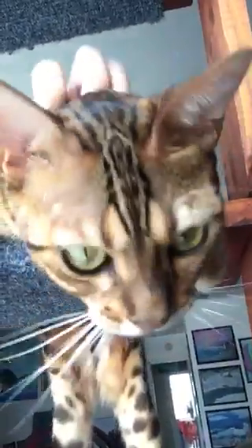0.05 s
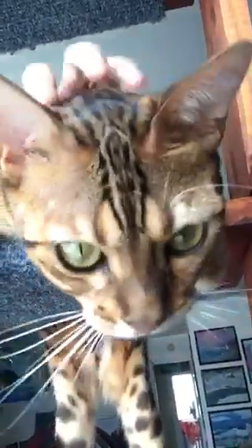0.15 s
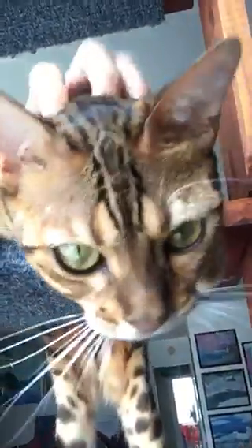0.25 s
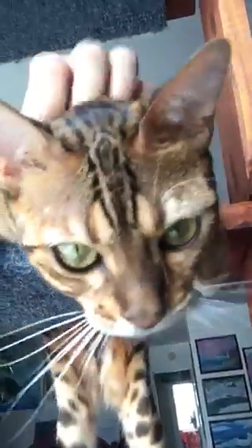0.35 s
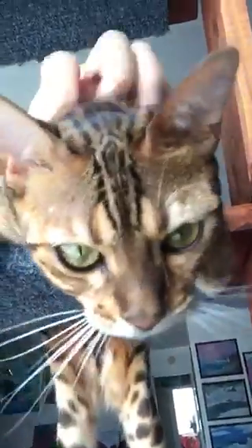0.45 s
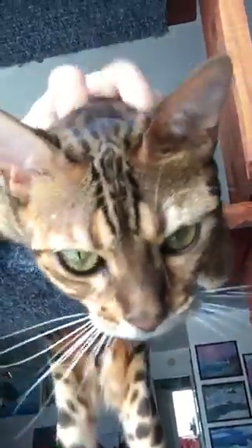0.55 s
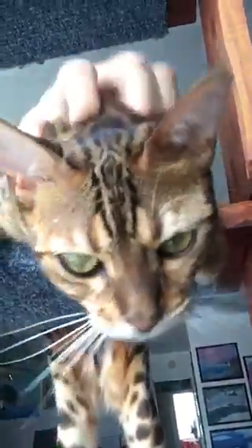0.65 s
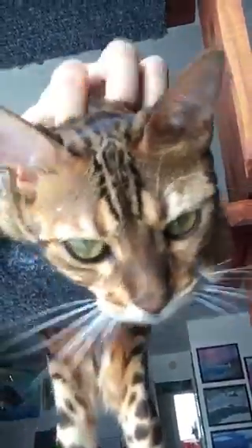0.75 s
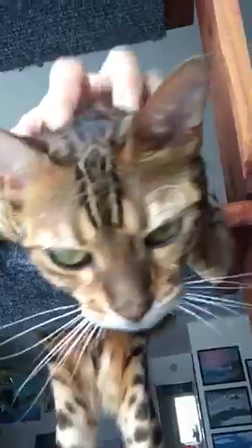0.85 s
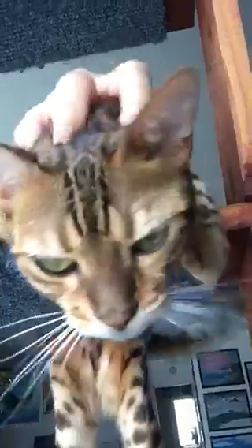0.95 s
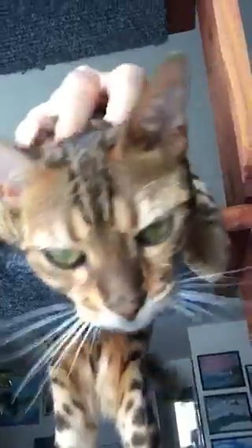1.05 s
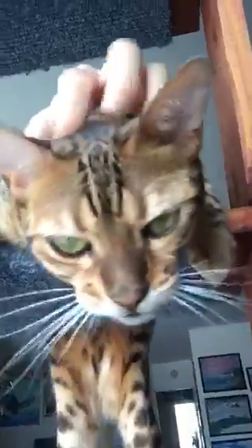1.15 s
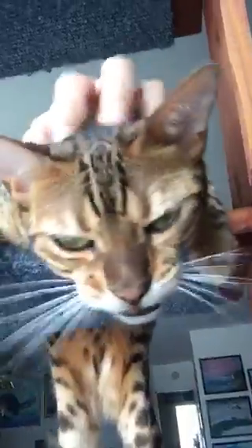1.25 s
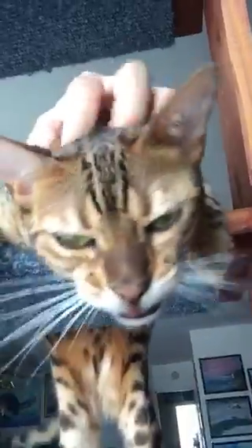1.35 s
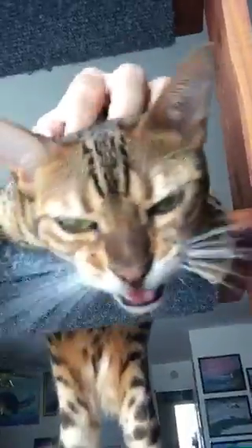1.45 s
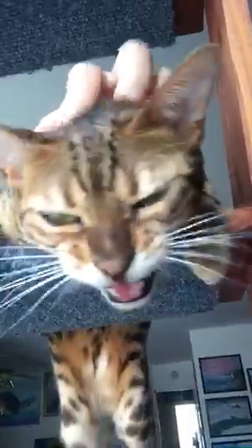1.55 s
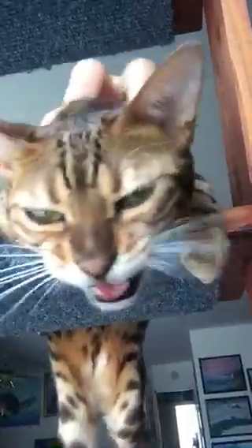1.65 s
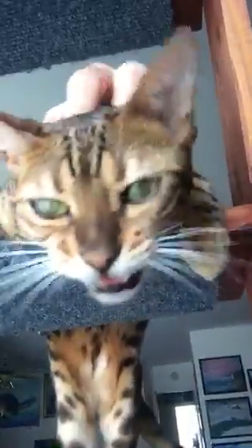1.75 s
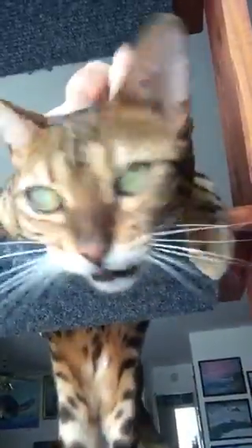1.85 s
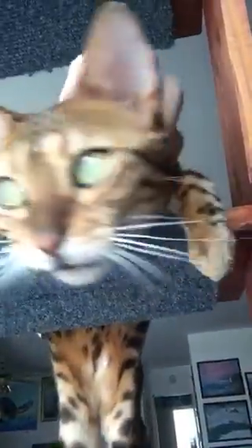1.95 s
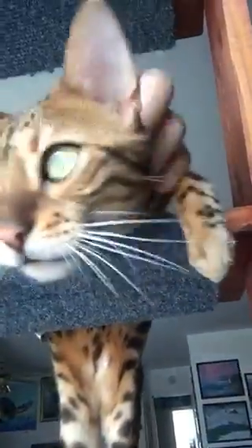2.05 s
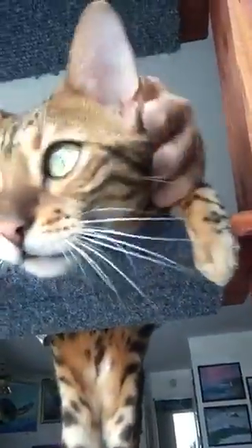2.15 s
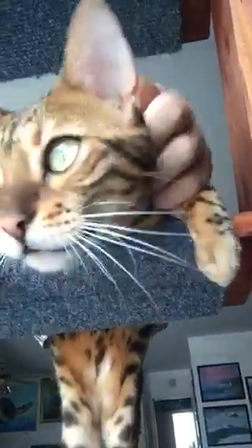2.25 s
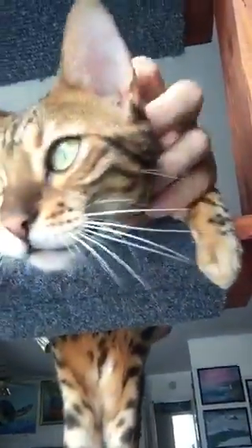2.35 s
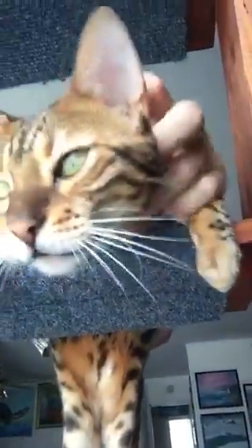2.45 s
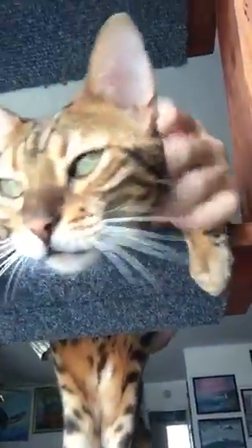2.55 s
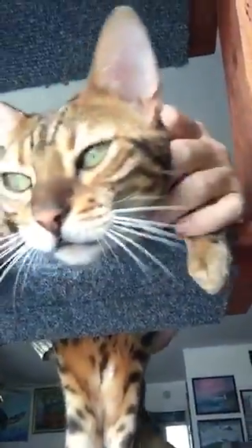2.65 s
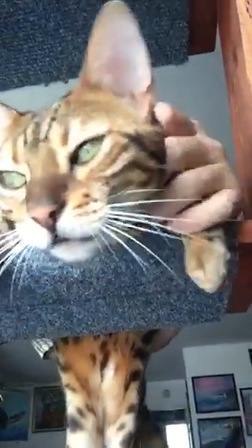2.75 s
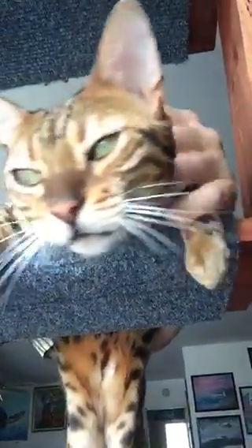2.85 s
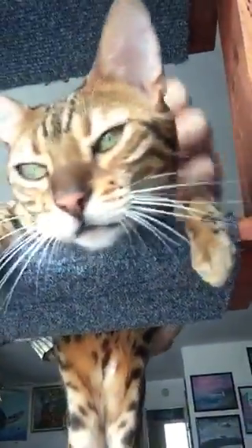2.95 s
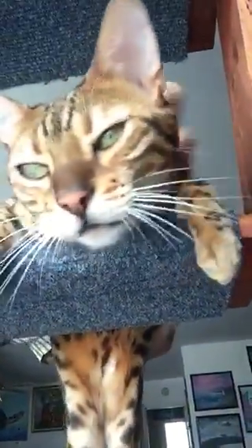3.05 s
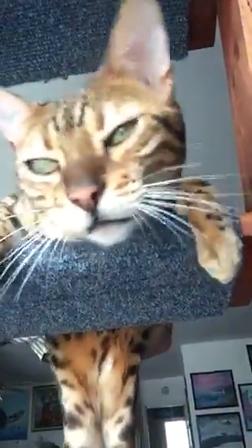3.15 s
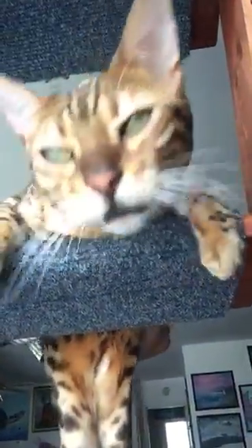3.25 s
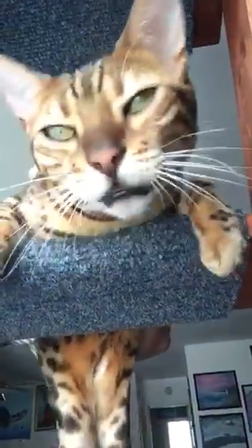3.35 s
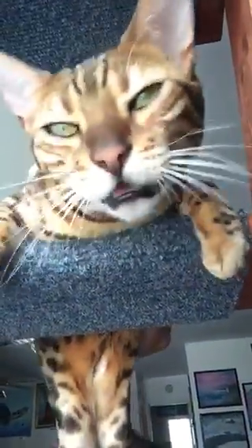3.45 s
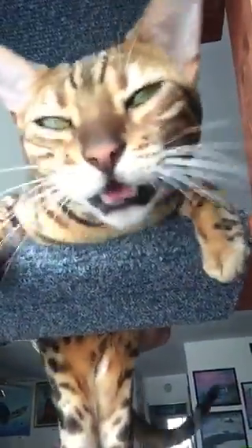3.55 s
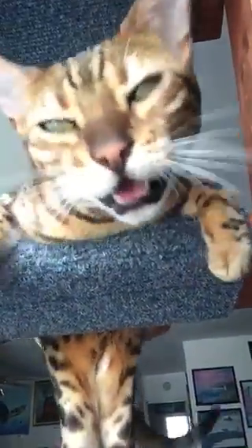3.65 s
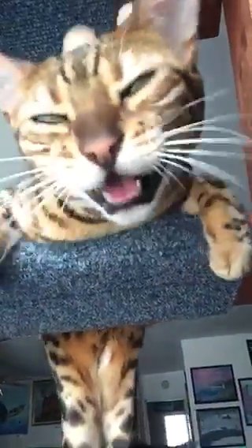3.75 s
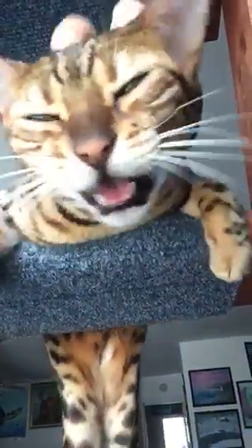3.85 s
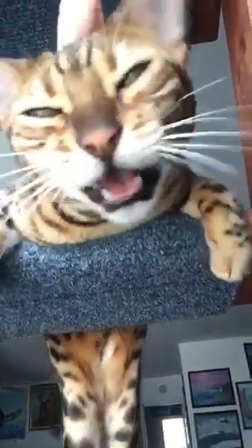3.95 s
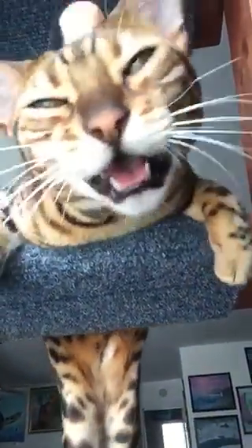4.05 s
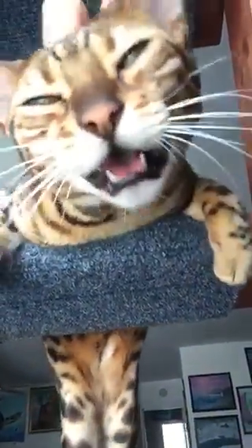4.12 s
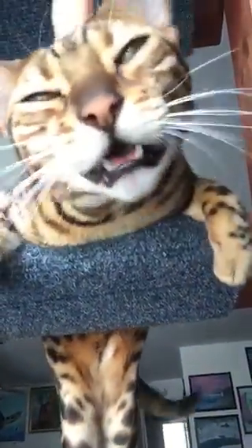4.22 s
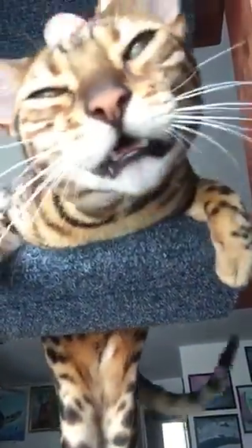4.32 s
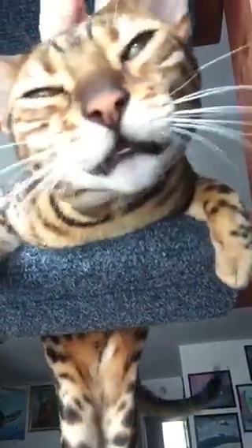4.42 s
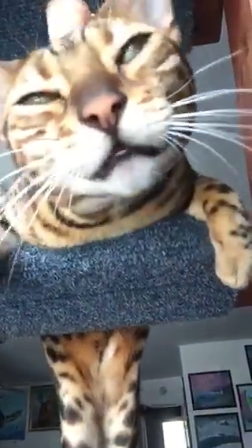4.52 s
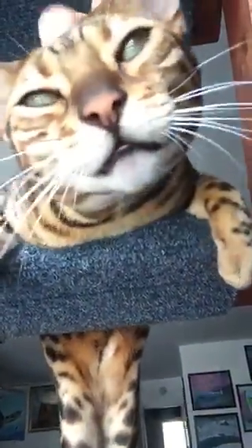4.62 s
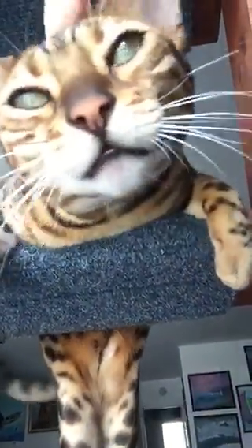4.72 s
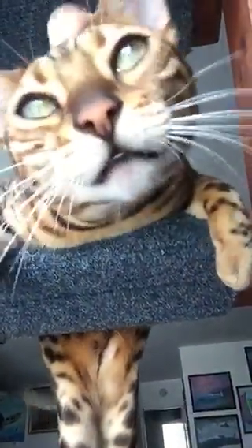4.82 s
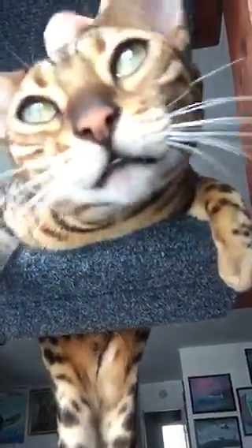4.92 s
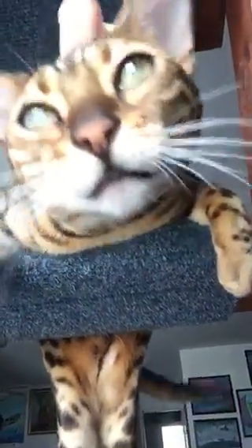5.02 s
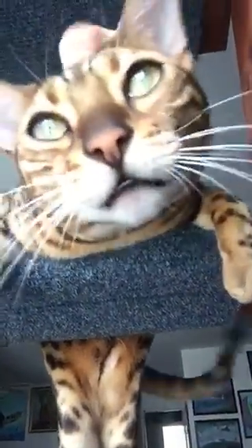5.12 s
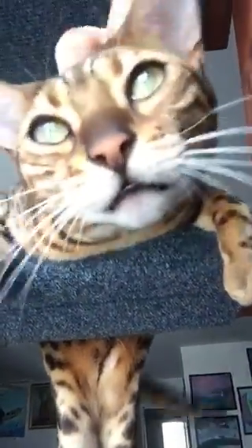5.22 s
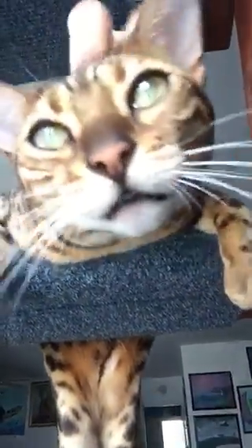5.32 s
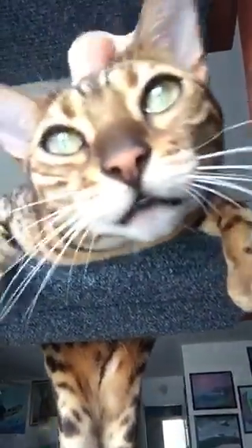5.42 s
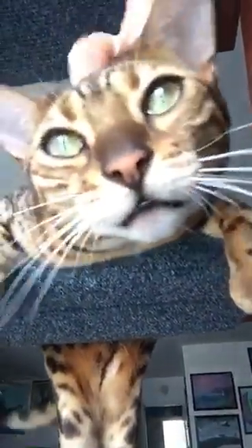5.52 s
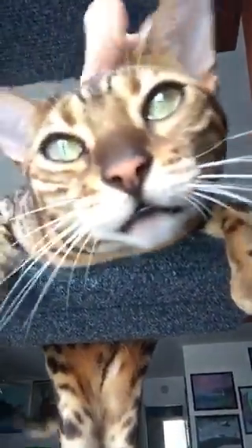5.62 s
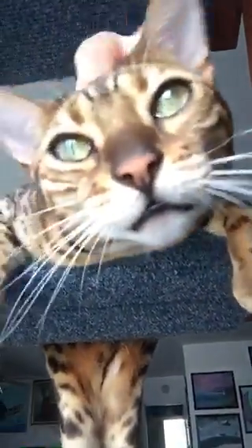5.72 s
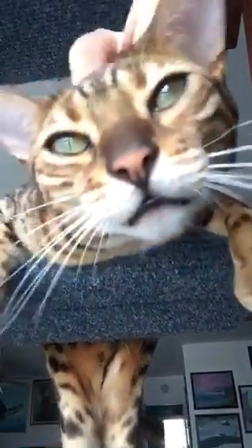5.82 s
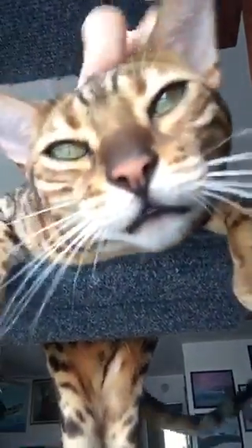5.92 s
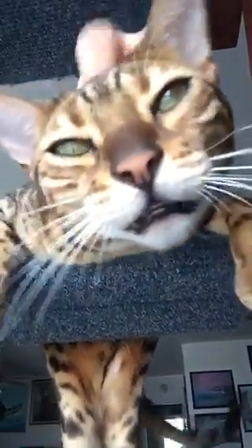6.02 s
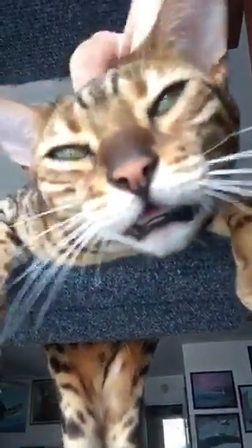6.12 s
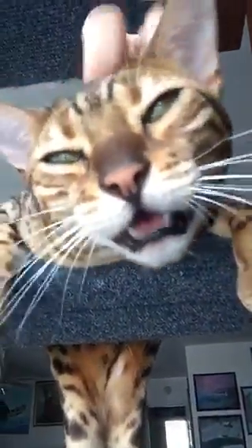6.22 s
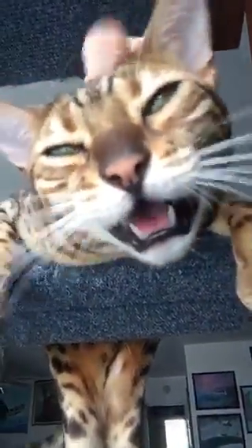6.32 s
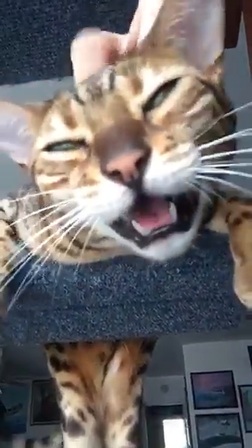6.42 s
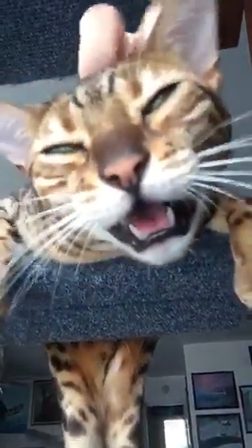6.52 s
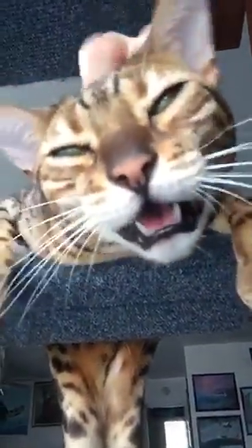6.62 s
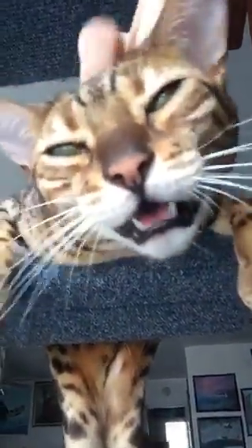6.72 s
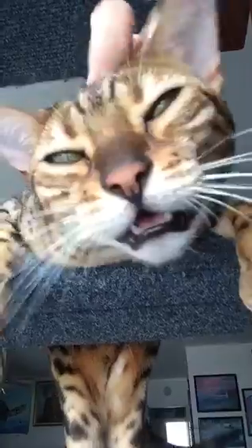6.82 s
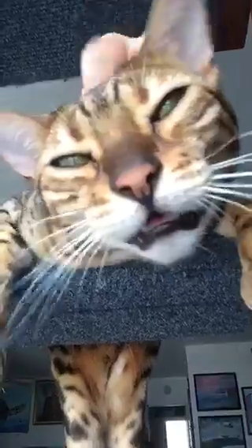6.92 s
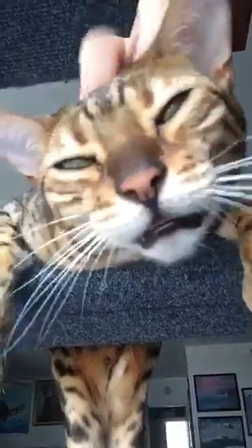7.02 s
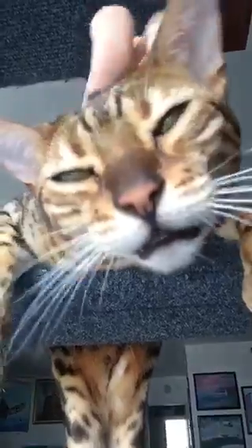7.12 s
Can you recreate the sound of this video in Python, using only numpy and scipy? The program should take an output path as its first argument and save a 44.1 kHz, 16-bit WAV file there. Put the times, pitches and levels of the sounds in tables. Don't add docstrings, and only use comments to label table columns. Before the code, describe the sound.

For the first second there is only faint steady hiss and the soft, low thrum of a hand rubbing a carpeted shelf. At 1.1 s a very close cat makes a short nasal murmur chopped by purring, opening at 1.3 into a bright, buzzy meow that sinks and creaks into a hoarse second syllable, closing with wet lip clicks by 1.9. The rubbing swells, strongest near 2.5, then eases. At 3.1 a longer purring murmur smooths out, with a click, into a wavering cry at 3.5; its last syllable starts low at 3.9, leaps up around 4.1, then drops into a clicking, purring gurgle until 4.5. Rubbing continues quietly. From 5.8 a third purring murmur grows, opens roughly at 6.1 and bursts into a full nasal cry at 6.3, closing around 6.7 to 6.9 with wet clicks, purr and a wisp of breath. The rubbing fades. Dry, small-room sound.

```python
import sys
import numpy as np
from scipy import signal
from scipy.io import wavfile
from scipy.ndimage import uniform_filter1d, map_coordinates

SR = 44100
rng = np.random.default_rng(int(sys.argv[2]) if len(sys.argv) > 2 else 0)


def voltage_ratio(decibels):
    exponent = np.asarray(decibels, float) / 20
    return 10 ** exponent


def master(y):
    cut = np.clip(np.atleast_2d(y).T, -1, 1)
    pcm = np.round(cut * 32767)
    wavfile.write(sys.argv[1], SR, pcm.astype(np.int16))


N = 316197
T = np.arange(N) / SR

# time in seconds, pitch in Hz, effort in dB,
# jaw opening 0-1, lips drawn back 0-1, tongue resonance in Hz.
FIRST_CALL = [
    [(1.282, 300.4, -41, 0.7, 0.9, 2630), (1.296, 319.6, -30, 0, 0, 2590),
     (1.321, 324.2, -34, 0.15, 0.2, 2700), (1.376, 297.1, -40, 0.57, 0.08, 2920),
     (1.41, 300, -44, 0.44, 0.5, 2750), (1.45, 261.8, -50, 0.65, 0.5, 2800),
     (1.5, 152.7, -60.5, 0.4, 0.2, 2720)],
    [(1.53, 263.2, -65, 0.33, 0.72, 2900), (1.55, 325.6, -43, 0.6, 0.39, 3000),
     (1.605, 297.5, -52.5, 0.95, 0.49, 2940), (1.622, 291.3, -55.5, 0.3, 0.55, 2870),
     (1.66, 216.8, -51.5, 0.53, 0.38, 3000), (1.75, 202.4, -51.5, 0.46, 0.62, 2700),
     (1.764, 201.8, -49, 1, 0.57, 2746)],
]
SECOND_CALL = [
    [(3.535, 286, -35, 0.11, 0.018, 2550), (3.562, 314.9, -32, 0.1, .05, 2566),
     (3.614, 290.8, -33, .2, 0.065, 2640), (3.69, 266.3, -40.5, 0.19, 0.086, 2480),
     (3.71, 276.3, -38, 0.38, 0.097, 2374), (3.77, 300, -38, 0.45, 0.22, 2550),
     (3.8, 273, -39, 0.27, 0.46, 3000), (3.828, 300.5, -37, 0.4, 0.53, 2800),
     (3.89, 278.3, -41.5, 0.31, 0.74, 2670)],
    [(3.92, 202.7, -49.5, 0.28, 0.45, 2700), (3.975, 227.9, -42.5, 0.47, 0.39, 2700),
     (4.03, 216.2, -47, 0.89, 0.68, 2700), (4.05, 296, -40, 0.58, 0.6, 2700),
     (4.094, 328, -36.5, 0.56, 0.73, 2700), (4.13, 377.4, -31.5, .7, 0.35, 2570),
     (4.172, 353.9, -35.5, 0.57, 0.65, 2660), (4.215, 296.9, -49, 1, 1.32, 2520)],
]
THIRD_CALL = [
    [(6.125, 178.9, -56, 0.81, 0.84, 2531), (6.145, 189.6, -53, 0.69, 0.76, 2470),
     (6.216, 204.7, -45, 0.89, 0.47, 2550), (6.295, 193.3, -42.5, 0.71, 0.33, 2430),
     (6.312, 189.2, -51, 0.64, 0.25, 2629)],
    [(6.324, 222, -33, 0.079, .3, 2550), (6.376, 280, -31, 0.13, 0.016, 2610),
     (6.45, 309.5, -32.5, 0.32, 0.072, 2892), (6.51, 313, -37, 0.82, .05, 2654),
     (6.6, 300, -40.5, 0.61, 0.74, 2608), (6.65, 259.6, -41, 0.37, 0.86, 2720),
     (6.669, 223, -56.5, 0.52, 1.28, 2763)],
]
MEOWS = FIRST_CALL + SECOND_CALL + THIRD_CALL
# time in seconds, pitch in Hz, level in dB,
# brightness in dB above 1.9 kHz. First through the nose, then through closing lips, then the gurgle.
MURMUR = [
    [(1.123, 176, -54.5, -10), (1.2, 179.5, -41.5, -8.5), (1.25, 186.9, -51, -6), (1.275, 199, -57, 5)],
    [(3.095, 154.2, -85, -11), (3.105, 154.2, -58, -14), (3.336, 167, -41, -9.5), (3.532, 186.7, -40.5, -2)],
    [(5.765, 145.3, -60, -23), (5.813, 146.8, -54, -17.5), (5.97, 153.9, -50, -13),
     (6.11, 177.2, -44, -11.5), (6.322, 187.5, -35, -7)],
]
CLOSING = [
    [(1.815, 201.7, -37, 17), (1.822, 201, -44.5, 15), (1.855, 198.4, -49.5, 13)],
    [(6.695, 271.2, -41, 8), (6.72, 296, -33.5, 0), (6.8, 260.8, -36, 3), (6.84, 239, -44.5, 7.5),
     (6.87, 128.9, -44.5, -3), (6.9, 129.6, -63, 14)],
]
GURGLE = [
    [(4.225, 293.9, -40, 5), (4.27, 279.8, -41.5, 6.5), (4.292, 175, -40.5, 3), (4.33, 150, -39.5, -1.5),
     (4.35, 123.7, -60, -2), (4.408, 129.8, -52.5, -1), (4.43, 134.9, -58, 0), (4.46, 138, -82, -2)],
]
# time in seconds, pitch in Hz, effort in dB, half length in seconds.
WAVERS = [
    (1.425, -28, -3, 0.013),
    (3.587, -16, 0, 0.013),
    (3.665, 8, 2, 0.011),
    (3.73, 6.5, 2.5, .012),
    (3.861, -7, 0.5, .014),
    (4.103, -5, -0.3, 0.0089),
    (4.111, 5, 0.5, .008),
    (6.413, -8, 1, 0.018),
    (6.487, 6.5, -2, .025),
    (6.622, 6, 1.5, 0.022),
]
# time in seconds, strength in dB.
SNAGS = [(1.383, -2.5), (1.402, 2), (1.428, 0), (1.435, 5), (1.445, 7), (1.544, 1), (1.635, 6), (1.653, 7),
         (1.679, 3), (1.696, 4), (1.72, 6), (1.74, 9), (1.746, 7), (1.749, 7), (4.291, 7), (6.15, 3),
         (6.214, 2.5), (1.845, 0.5)]
# time in seconds, strength in dB.
THROBS = [(1.126, 0.5), (1.142, -1.5), (1.172, -3), (1.212, -1), (1.241, -3), (1.276, 0), (3.104, -1.5),
          (3.135, -1), (3.159, 0), (3.19, -2), (3.228, 0.5), (3.264, -0.5), (3.295, -1.5), (3.331, 0.5),
          (3.366, -1), (3.403, 0), (3.437, 0), (3.468, 0), (3.499, 0.5), (3.533, 2), (4.339, -3),
          (4.374, 0.5), (4.408, -0.5), (4.444, 0), (4.475, 2), (5.802, 0), (5.832, -0.5), (5.871, 3.5),
          (5.905, 1.5), (5.939, 3), (5.973, 0.5), (6.005, 1), (6.04, 3), (6.074, 2), (6.108, 0.5),
          (6.139, -1.5), (6.178, -0.5), (6.211, -1.5), (6.243, -3), (6.28, -4), (6.322, 5), (6.847, -4),
          (6.88, 0), (6.911, 2), (6.945, -2), (6.98, -5)]


def evened(x):
    return x / np.sqrt(np.mean(x ** 2) + 1e-20)


def levelled(x, seconds=0.046):
    size = int(seconds * SR)
    power = uniform_filter1d(uniform_filter1d(x ** 2, size), size)
    return x / np.sqrt(abs(power) + 1e-12)


def columns(tables):
    s, *values = np.vstack(tables).T
    return [np.interp(T, s, v) for v in values]


def sounding(tables, edge=0.0046):
    on = sum((T >= rows[0][0]) & (T <= rows[-1][0]) for rows in tables) > 0
    return uniform_filter1d(on * 1., int(edge * SR))


def puffed(rows, edge):
    on = np.zeros(N)
    for s, length, db, fall_db in rows:
        inside = (T >= s) & (T <= s + length)
        on += inside * voltage_ratio(db - fall_db * np.clip((T - s) / length, 0, 1))
    return uniform_filter1d(on, int(edge * SR))


def bumps(rows):
    out = np.zeros(N)
    for s, height, half in rows:
        near = slice(round((s - .08) * SR), round((s + .08) * SR))
        out[near] += height * np.exp(-((T[near] - s) / half) ** 2)
    return out


def wander(per_s):
    knots = rng.standard_normal(8000)
    return map_coordinates(knots, [T * per_s], order=1)


def colour(x, points):
    hz, db = np.transpose(points)
    bins = np.fft.rfftfreq(4096, 1 / SR)
    half = np.interp(np.log(bins + 1), np.log(hz + 1), np.maximum(db, -90), left=-90, right=-90)
    log_gain = np.log(voltage_ratio(uniform_filter1d(np.r_[half, half[-2:0:-1]], size=5, mode="wrap")))
    response = np.fft.ifft(np.exp(log_gain - 1j * signal.hilbert(log_gain).imag)).real
    return signal.oaconvolve(x, response)[:N]


def resonate(x, hz, width):
    turn = np.exp(2j * np.pi * np.cumsum(hz * np.ones(N)) / SR)
    r = np.exp(-np.pi * width / SR)
    return 2 * (turn * signal.lfilter([(1 - r) ** 2], [1, -2 * r, r * r], x / turn)).real


def flutter(x, patchy_db=1.7, loss=None):
    hz, s, z = signal.stft(x, SR, nperseg=512, noverlap=384)
    patches = rng.standard_normal(z.shape[::-1]).T
    patches = evened(uniform_filter1d(uniform_filter1d(patches, size=5, axis=0), size=12, axis=1))
    gain_db = patchy_db * patches + (loss(hz, s) if loss else 0)
    return signal.istft(z * voltage_ratio(gain_db), SR, nperseg=512, noverlap=384)[1][:N]


def cat():
    drive = folds()
    rasp = drive + .025 * rng.standard_normal(N)
    voice = open_mouth(drive, rasp) + jaw_pocket(drive) - shut_mouth(drive)
    breath = air_past_teeth(drive) + nostril_whistle(rasp)
    snag_s = 0.0012
    jolts = voltage_ratio(bumps([(s, 0.34 * snag_db, snag_s) for s, snag_db in SNAGS]))
    return purr() * jolts * (voice + breath)


def folds():
    uneven_db, release_db = 2.5, 1
    rows = np.vstack([np.array(curve)[:, :2] for curve in MEOWS + MURMUR + CLOSING + GURGLE])
    hz = np.interp(T, *rows[np.argsort(rows[:, 0])].T) + bumps(np.array(WAVERS)[:, [0, 1, 3]])
    rough, depth = roughness(), purr_depth()
    turns = np.cumsum(hz * np.exp(.5 * rough * wander(300))) / SR
    at = np.flatnonzero(np.diff(np.floor(turns))) + 1
    at = at[(at > 8) & (at < N - 9)]
    late = (turns[at] % 1) / (turns[at] - turns[at - 1])
    size = voltage_ratio((3.6 * rough + uneven_db * depth)[at] * rng.standard_normal(N)[at])
    taps, pulses = np.arange(-8, 9), np.zeros(N)
    kernel = np.sinc(taps + late[:, None]) * np.hanning(19)[1:-1]
    np.add.at(pulses, at[:, None] + taps, -size[:, None] * kernel)
    releases = [(s + .002, release_db) for s, _ in THROBS if depth[round(s * SR)] > .55]
    for s, db in SNAGS + releases:
        pulses[round(s * SR)] -= voltage_ratio(db)
    puffs = np.exp(-(turns % 1) / .5) * rng.standard_normal(N)
    return pulses + (.004 + .12 * rough) * puffs


def roughness():
    # start in seconds, end in seconds, roughness 0-1.
    steady = [(1.285, 1.405, .04), (1.55, 1.61, .06), (3.4, 3.52, .46), (3.54, 3.89, .028),
              (3.925, 4.03, .15), (4.06, 4.195, .03), (4.232, 4.265, .2), (6.14, 6.3, .26),
              (6.33, 6.43, .04), (6.44, 6.63, .02), (6.71, 6.78, .02)]
    creak, settle_s, break_s = .48, .022, .045
    away = []
    for start, end, rough in steady:
        outside = np.maximum((start - T) / settle_s, (T - end) / break_s)
        away.append(rough + creak * np.maximum(outside, 0))
    rattle = 2.0 * np.maximum(purr_depth() - .75, 0)
    return np.minimum(np.min(away, axis=0), creak) + rattle


def purr_depth():
    # start in seconds, length in seconds, depth 0-1 at the start and at the end.
    purrs = [
        (1.127, .148, .7, .7),
        (3.1, .433, .85, .12),
        (4.338, .13, .88, .8),
        (5.8, .52, .9, .25),
        (6.845, .13, .85, .5),
    ]
    depth = np.zeros(N)
    for s, length, a, b in purrs:
        depth += ((T >= s - .01) & (T <= s + length)) * np.interp(T, [s, s + length], [a, b])
    return depth


def purr():
    s, strength_db = np.transpose(THROBS)
    count = np.interp(T, s, np.arange(len(s)))
    shut = uniform_filter1d(np.clip((count % 1 - 0.67) / 0.24, 0, 1), size=80)
    depth = uniform_filter1d(purr_depth(), size=300)
    throb_db = uniform_filter1d(strength_db[count.astype(int)], size=80) * (depth > .01)
    return (1 - depth * shut) * voltage_ratio(depth * (10.5 + 2 * wander(40)) + throb_db)


def open_mouth(drive, rasp):
    # pitch in Hz, width in Hz, level in dB.
    upper_rings = [(3730, 840, -0.5), (4550, 570, 1), (5317, 440, -1), (6330, 1200, -10)]
    # time in seconds, factor.
    reach_curve = [(1.28, 1), (1.5, 0.92), (1.77, 1.06), (3.53, 0.94), (3.59, 0.97), (3.7, 0.95),
                   (3.8, 1.02), (3.9, 0.94), (4.05, 0.91), (4.2, 0.96), (6.12, 1.086), (6.33, 1.01),
                   (6.42, .99), (6.55, 0.94), (6.67, 0.94)]
    # time in seconds, level in dB.
    bite = [(1.28, 2.5), (1.77, 0), (3.53, 0), (3.9, -3.5), (4.0, 1.3), (6.3, 3.6), (6.33, -2), (6.67, 0)]
    _, db, jaw, lips, third_hz = uniform_filter1d(columns(MEOWS), size=600)
    db = db + bumps(np.array(WAVERS)[:, [0, 2, 3]])
    nose_open = sounding(MURMUR)
    louder = db + 40

    first = resonate(drive, 781 + 300 * jaw, 540) - voltage_ratio(-5) * resonate(drive, 308, 48)
    first_db = -11 + 8.5 * jaw - 0.26 * louder
    mouth = (1 - nose_open) * voltage_ratio(first_db) * levelled(first, 0.017)

    second = resonate(drive, 1836 + 0.18 * (third_hz - 2700), 597)
    mouth = mouth - voltage_ratio(-3 * (0.5 + nose_open)) * levelled(second, 0.0078)

    third_db = -4.5 + columns([bite])[0] + 8 * lips - 4.5 * jaw + 2 * nose_open - .05 * louder
    mouth = mouth + voltage_ratio(third_db) * levelled(resonate(drive, third_hz, 670), 0.042)
    core_db = third_db - 9.5 + 6.5 * nose_open
    mouth = mouth + voltage_ratio(core_db) * levelled(resonate(drive, third_hz, 223), 0.035)

    upper, reach = 0, columns([reach_curve])[0]
    for k, (hz, width, peak_db) in enumerate(upper_rings):
        level = (-1) ** k * voltage_ratio(peak_db + 2 * wander(18))
        upper = upper + level * resonate(rasp, reach * hz * (1 + .018 * wander(10)), width)
    mouth = mouth - voltage_ratio(-19.5 + 19.5 * lips) * levelled(upper, 0.023)

    calls = [sum(call, []) for call in (FIRST_CALL, SECOND_CALL)] + THIRD_CALL
    return -voltage_ratio(db) * sounding(calls, 0.0021) * mouth


def shut_mouth(drive):
    # frequency in Hz, level in dB.
    nose_tone = [(59, -60), (100, -10.5), (154, 3), (271, -6), (477, -4.5), (587, -3), (709, -20.5),
                 (994, -4.5), (1220, -9), (2000, -11), (2450, -6.5), (3710, -12), (4240, -24.5),
                 (6790, -61), (9000, -46), (11700, -96.5), (19800, -120)]
    lips_tone = [(88, -47), (150, -7.5), (278, -12.5), (441, -9.5), (571, -5.5), (677, -22), (861, -8.5),
                 (954, -7.5), (1740, -16), (2170, -32.5), (3010, -19), (3820, -44), (9000, -65),
                 (11700, -92), (19800, -120)]
    gurgle_tone = [(88, -28), (150, 6), (366, 4), (498, -3), (581, 5.5), (751, -18.5), (1060, 2.5),
                   (2250, -14), (3060, -10), (4090, -22), (5380, -25), (9000, -46), (11700, -61),
                   (19800, -120)]
    # pitch in Hz, width in Hz, level in dB.
    sinus = [(1202, 210, 2), (1632, 360, -1), (2480, 750, -4), (3800, 320, 0.5)]
    nasal = drive + .035 * rng.standard_normal(N)
    for hz, width, ring_db in sinus:
        nasal = nasal + voltage_ratio(ring_db) * resonate(drive, hz * (1 + .05 * wander(25)), width)
    murmur = muffled(nasal, MURMUR, nose_tone)
    return murmur + muffled(drive, CLOSING, lips_tone) + muffled(drive, GURGLE, gurgle_tone)


def muffled(drive, tables, spectrum):
    _, db, bright_db = columns(tables)
    x = levelled(colour(drive, spectrum), .025)
    band = signal.butter(3, [1900, 5200], "bandpass", fs=SR, output="sos")
    bright = signal.sosfiltfilt(band, x)
    return voltage_ratio(db - 2.4) * sounding(tables) * (x + (voltage_ratio(bright_db + 0.92 * wander(30)) - 1) * bright)


def jaw_pocket(drive):
    # time in seconds, level in dB, pitch in Hz.
    closing_jaw = [(4.222, -65, 1510), (4.245, -39, 1250), (4.27, -49.5, 922.6), (4.29, -53, 370),
                   (4.33, -59, 357.8)]
    db, hz = columns([closing_jaw])
    ring = resonate(drive, hz * (1 + 0.025 * wander(83)), 320)
    return voltage_ratio(db) * sounding([closing_jaw]) * levelled(ring, 0.014)


def air_past_teeth(drive):
    # start in seconds, length in seconds, level in dB, fall in dB.
    hisses = [
        (1.282, 0.044, -67, 11),
        (1.72, 0.046, -76, 0),
        (3.595, .035, -64, 11),
        (4.04, 0.18, -73, 2),
        (6.14, .15, -68, -2),
        (6.32, 0.03, -64, 3),
    ]
    # frequency in Hz, level in dB.
    air_tone = [(4120, -9.5), (7000, -22.5), (9350, -21), (10100, -32), (11300, -17.5), (12500, -38),
                (14200, -22.5), (14800, -33), (15500, -41)]
    blurred = drive + 0.037 * rng.standard_normal(N)
    return puffed(hisses, 0.0059) * levelled(colour(blurred, air_tone))


def nostril_whistle(rasp):
    # start in seconds, length in seconds, level in dB, fall in dB.
    whistles = [
        (3.12, 0.21, -84.5, -7),
        (4.38, .17, -78.5, 1),
        (5.79, 0.36, -79.5, 3),
        (6.89, 0.096, -63.5, 28),
    ]
    return puffed(whistles, 0.014) * levelled(resonate(rasp, 6620, 1060))


def swallowed(hz, s):
    # time in seconds, centre in Hz, half width in Hz, depth in dB.
    side_pocket = [
        [(1.12, 4750, 500, 7), (1.2, 4140, 550, 25), (1.275, 3700, 700, 22)],
        [(1.33, 4180, 400, 11), (1.37, 3850, 450, 1), (1.47, 3900, 400, -4)],
        [(3.1, 4793, 449.2, -2), (3.35, 4400, 450.4, 17), (3.53, 4140, 510.3, 40)],
        [(3.545, 3687, 300, 10), (3.59, 3600, 250, 11), (3.63, 4130, 300, 4), (3.69, 3290, 300, -9),
         (3.73, 3020, 250, 10), (3.77, 4250, 300, -1), (3.85, 4450, 250, 6), (3.9, 4285, 250, 5)],
        [(3.91, 3500, 300, -1), (4.03, 3403, 300, 3), (4.13, 3243, 200, 5), (4.2, 3450, 300, 8)],
        [(4.222, 4616, 900, 13), (4.27, 4600, 700, 16)],
        [(5.8, 4924, 449.7, 6), (6.0, 4496, 451.6, 2), (6.12, 4224, 501.2, 13)],
        [(6.135, 14000, 1495, 12), (6.3, 13960, 1510, 10)],
        [(6.33, 3600, 300, 12), (6.4, 3800, 249, 8), (6.47, 3872, 300, 11), (6.56, 3723, 250.3, -1),
         (6.66, 3800, 248.8, 8)],
        [(6.7, 4398, 593.6, 17), (6.83, 4414, 599.6, 16)],
    ]
    at, centre, width, depth_db = np.vstack(side_pocket).T
    lasting = sum((s >= rows[0][0]) & (s <= rows[-1][0]) for rows in side_pocket)
    on = uniform_filter1d(lasting * 1., size=3)
    away = (hz[:, None] - np.interp(s, at, centre)) / np.interp(s, at, width)
    return -on * np.interp(s, at, depth_db) * np.exp(-away ** 2)


def wet():
    # time in seconds, peak in dB, ring in Hz, treble in dB over the peak.
    clicks = [
        (1.508, -45, 3580, -37),
        (1.815, -46, 6300, -39.5),
        (1.876, -66, 3490, -27),
        (1.908, -50, 3750, -48),
        (3.371, -44, 4700, -60),
        (4.228, -47, 6400, -42),
        (4.34, -38.5, 6000, -36),
        (4.409, -45.5, 3550, -36),
        (6.8452, -38, 5030, -32),
        (6.88, -38, 3500, -35),
    ]
    # time in seconds, level in dB.
    smack_curve = [(1.85, -54), (1.868, -49), (1.879, -38.5), (1.89, -53), (1.908, -47.5), (1.92, -65),
                   (1.96, -75)]
    # frequency in Hz, level in dB.
    smack_tone = [(1180, -62), (2000, -27), (3020, -11), (3520, 0.5), (4190, -21), (4830, -13), (5070, -27),
                  (5870, -30), (6160, -24), (6590, -16.5), (10000, -45), (13000, -67), (22000, -120)]
    out, t = np.zeros(N + SR), np.arange(900) / SR
    for (s, db, hz, treble_db), noise in zip(clicks, rng.standard_normal((len(clicks), 900))):
        fade = np.exp(-t / .002) * np.minimum(t / .0008, 1)
        ring = np.sin(2 * np.pi * hz * t) * uniform_filter1d(noise, size=24) * 4.5 * fade
        treble = np.diff(noise, 2, prepend=[0, 0]) * np.exp(-t / 0.0044)
        out[round(s * SR):][:900] += voltage_ratio(db) * (ring + voltage_ratio(treble_db - 3) * treble)
    smack = evened(colour(rng.standard_normal(N), smack_tone))
    smack_level = voltage_ratio(columns([smack_curve])[0] + 2 * wander(160)) * sounding([smack_curve], 0.011)
    return out[:N] + smack_level * smack


def spit():
    # time in seconds, peak in dB.
    ticks = [(1.126, -60), (1.283, -53.5), (1.3203, -48.5), (1.6886, -54), (1.711, -50.5), (3.5937, -46),
             (4.229, -64), (4.2774, -58), (4.3121, -62), (4.329, -63), (4.4079, -62), (6.126, -63),
             (6.326, -62), (6.6962, -59)]
    # pitch in Hz, width in Hz, level in dB.
    tick_rings = [(6400, 1050, 0.5), (8600, 1200, 3), (11800, 1000, -2), (14200, 1294, 1)]
    # start in seconds, length in seconds, level in dB, fall in dB.
    sprays = [
        (4.272, 0.029, -50.5, 9),
        (4.304, 0.024, -52.5, 4),
        (4.341, 0.027, -60.5, 1),
        (4.41, 0.022, -73, 5),
        (6.856, 0.021, -53.5, 3.5),
        (6.882, .012, -61, 4),
    ]
    # frequency in Hz, level in dB.
    spray_tone = [(3500, -20), (5200, 8.5), (7900, -2), (9500, -24), (11000, -6), (12600, -19), (14300, -5),
                  (15500, -27)]
    t, bursts = np.arange(400) / SR, np.zeros(N)
    for (s, db), (spread, *turn) in zip(ticks, rng.standard_normal((len(ticks), 5))):
        rings = 0
        for (hz, width, ring_db), k in zip(tick_rings, turn):
            tone = np.sin(2 * np.pi * hz * (1 + .02 * spread) * t)
            rings = rings + voltage_ratio(ring_db + 2.2 * k) * tone * np.exp(-np.pi * width * t * .5)
        bursts[round(s * SR):][:400] += voltage_ratio(db) * rings * np.minimum(t / .0003, 1)
    hiss = evened(colour(rng.standard_normal(N), spray_tone))
    return bursts + puffed(sprays, 0.0016) * voltage_ratio(3.3 * wander(300)) * hiss


def thuds():
    # time in seconds, peak in dB, pitch in Hz.
    catches = [
        (1.122, -37.5, 100),
        (3.097, -39, 170),
        (5.799, -45.5, 280.7),
    ]
    out, t = np.zeros(N), np.arange(6000) / SR
    for s, db, hz in catches:
        fall_db = 60 * t / .12
        out[round(s * SR):][:6000] += voltage_ratio(db - fall_db) * np.sin(2 * np.pi * hz * t)
    return out


def rubbing():
    # time in seconds, pressure in dB, stroke speed in dB.
    hand = [(0.0, -10.5, -2.5), (0.54, -11.5, 0.5), (0.94, -4.5, 2), (1.2, 0, -0.5), (1.5, 2, 7),
            (1.96, 4.5, 8), (2.5, 11.5, 2.5), (2.9, 7.5, 2), (3.4, 3.5, -3), (4.3, -2, 1.5), (4.8, -2, -9),
            (5.05, -6, -6.5), (5.6, 1, -8), (6.3, -13, -9.5), (6.93, -23, -1), (7.17, 0, -16)]
    # pitch in Hz, width in Hz.
    shelf = [(56, 16), (95, 77), (162, 74), (260, 80)]
    # level in dB, share of pressure, share of stroke.
    shelf_push = [(-65.5, 1, 0.054), (-55.5, 0.018, 0.13), (-58, 1, 0.026), (-61.5, 0.011, 0.51)]
    # frequency in Hz, level in dB.
    fur_tone = [(220, -13.5), (380, 0.5), (448, -15), (497, -5.5), (559, -2.5), (779, -12), (869, -2.5),
                (1080, -4), (1460, -7), (1580, -11.5), (2500, -35), (3250, -57), (5500, -120)]
    pressure_db, stroke_db = columns([hand])
    push = rng.standard_normal((len(shelf), N)) * voltage_ratio(3.1 * wander(10))
    thrum = 0
    for (db, a, b), p, (hz, width) in zip(shelf_push, push, shelf):
        thrum = thrum + voltage_ratio(db + a * pressure_db + b * stroke_db) * levelled(resonate(p, hz, width), 0.18)
    rustle = flutter(evened(colour(rng.standard_normal(N), fur_tone)), patchy_db=0.0)
    return thrum + voltage_ratio(-68 + 1.72 * stroke_db + 2 * wander(25)) * rustle


def echoes(near):
    # delay in seconds, level in dB.
    shelf_echoes = [(.0021, -19)]
    echo = voltage_ratio(-20.5) * room(near)
    for s, db in shelf_echoes:
        echo = echo + voltage_ratio(db) * np.roll(near, int(s * SR))
    return echo


def room(x):
    t = np.arange(SR // 4) / SR
    signs = rng.choice([-1., 1.], len(t)) * (rng.random(len(t)) < .05)
    taps = signs * voltage_ratio(-60 * t / .25) * (t > .004)
    return signal.oaconvolve(x, taps / np.linalg.norm(taps))[:N]


def steady_hiss():
    # frequency in Hz, level in dB.
    hiss_tone = [(240, -27.5), (400, -1), (473, -15.5), (535, -3), (834, -14), (1070, -8), (1260, -10),
                 (1320, -9), (1880, -12), (2000, -10), (2090, -13.5), (6200, -16.5), (15500, -27.5)]
    return voltage_ratio(-73) * evened(colour(rng.standard_normal(N), hiss_tone))


def scene():
    near = flutter(cat(), loss=swallowed) + wet() + spit() + thuds()
    return (near + echoes(near) + rubbing() + steady_hiss())[None]


def top_cut(x):
    return signal.sosfilt(signal.butter(12, 15690, fs=SR, output="sos"), x)


def record(dry):
    thinned = signal.sosfilt(signal.butter(2, 42, "highpass", fs=SR, output="sos"), dry)
    port_hz, port_width_hz = 2600, 1900
    r = np.exp(-np.pi * port_width_hz / SR)
    poles = [1, -2 * r * np.cos(2 * np.pi * port_hz / SR), r * r]
    smeared = signal.lfilter(poles[::-1], poles, thinned)
    return top_cut(smeared)


dry = scene()
out = record(dry)
master(out)
```